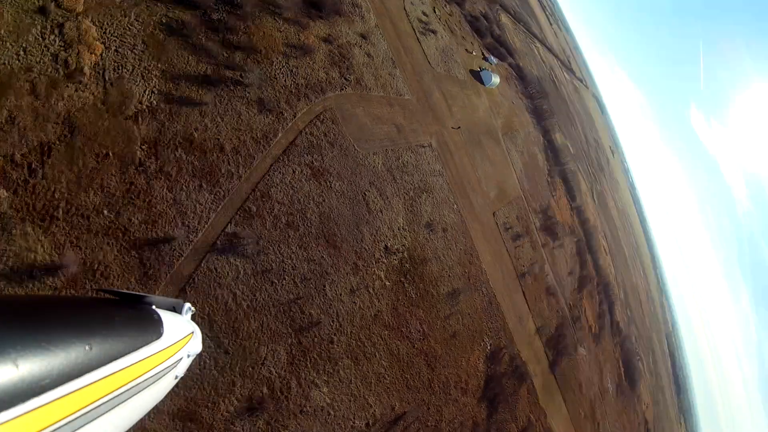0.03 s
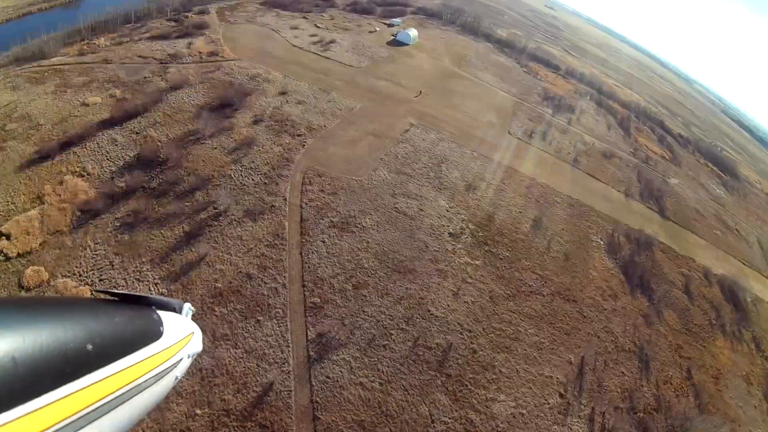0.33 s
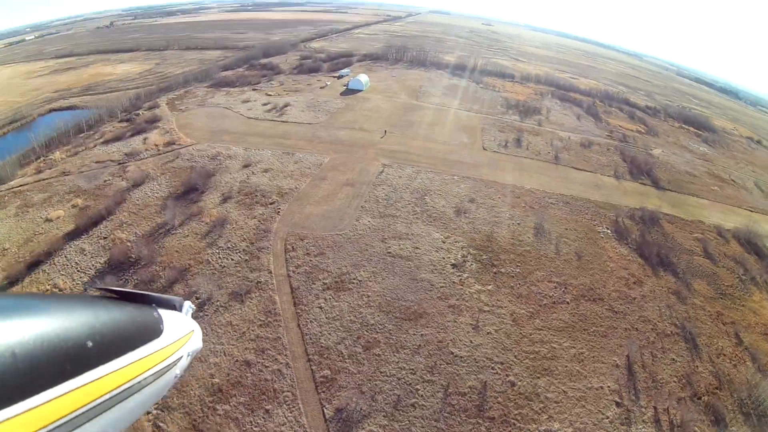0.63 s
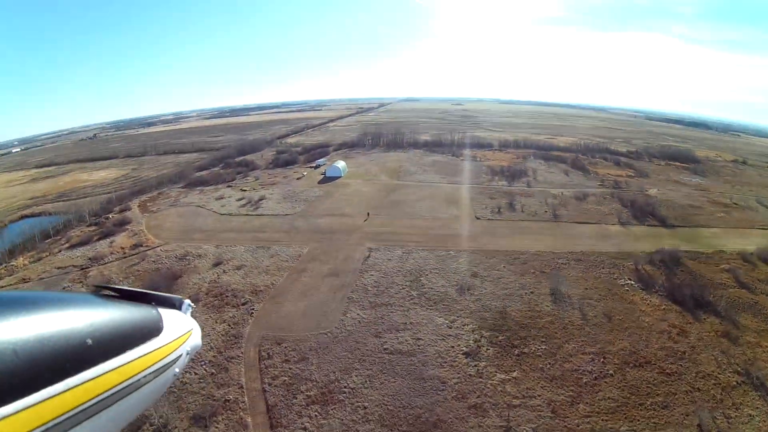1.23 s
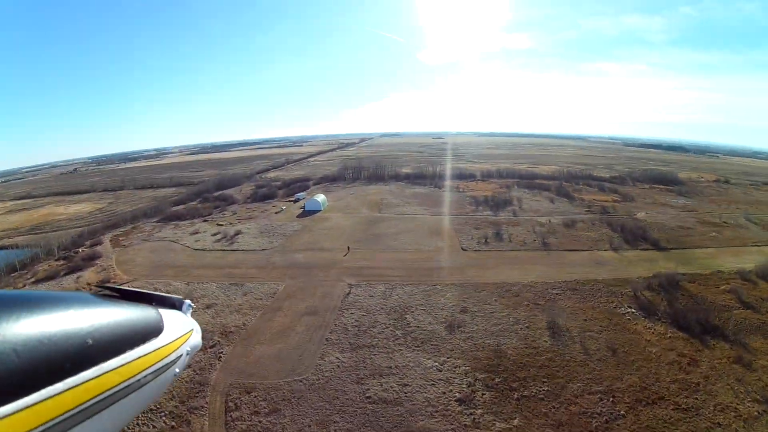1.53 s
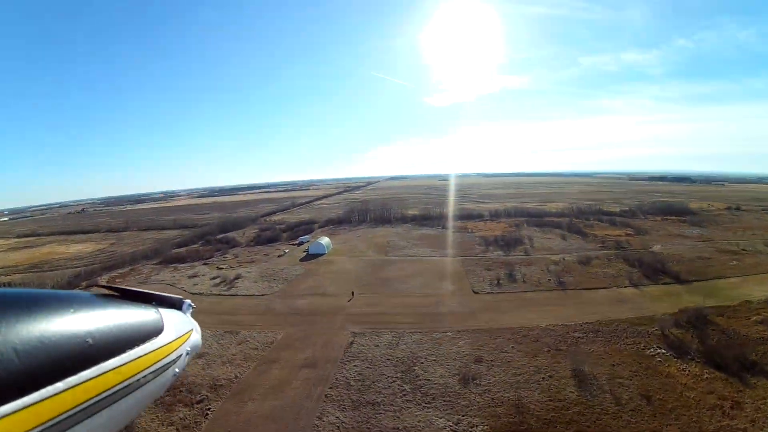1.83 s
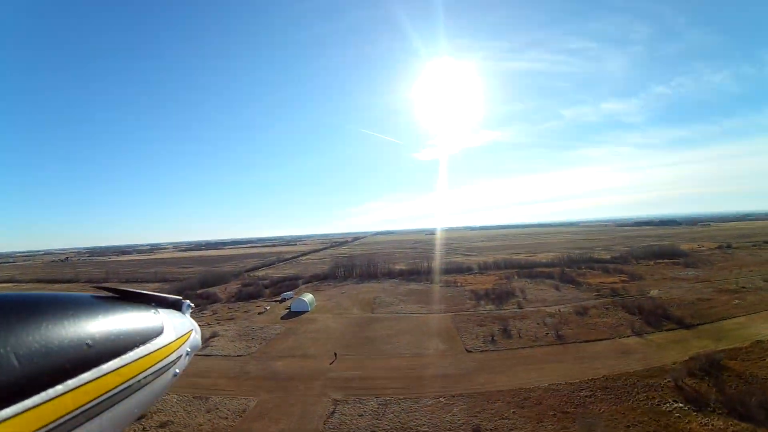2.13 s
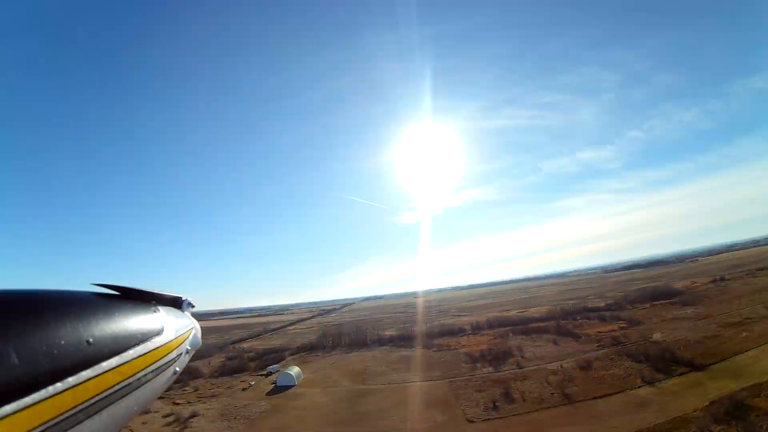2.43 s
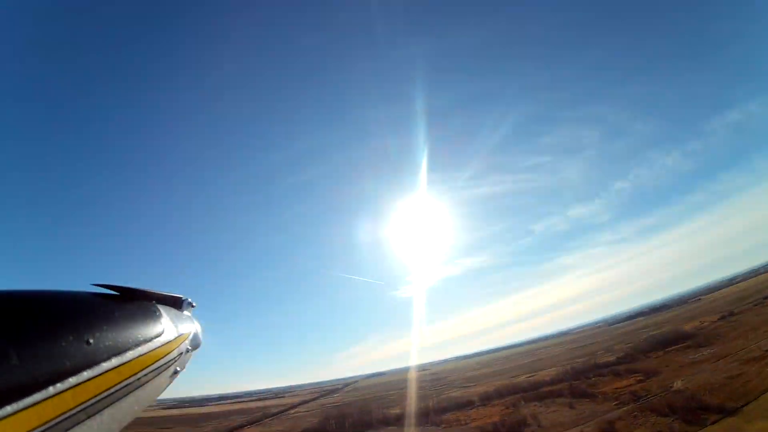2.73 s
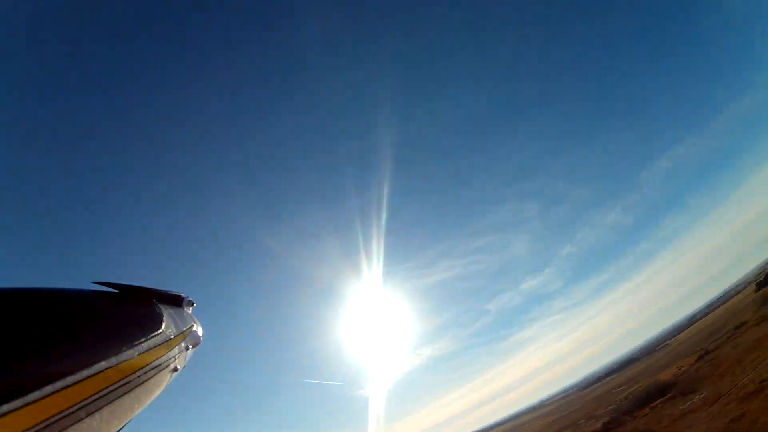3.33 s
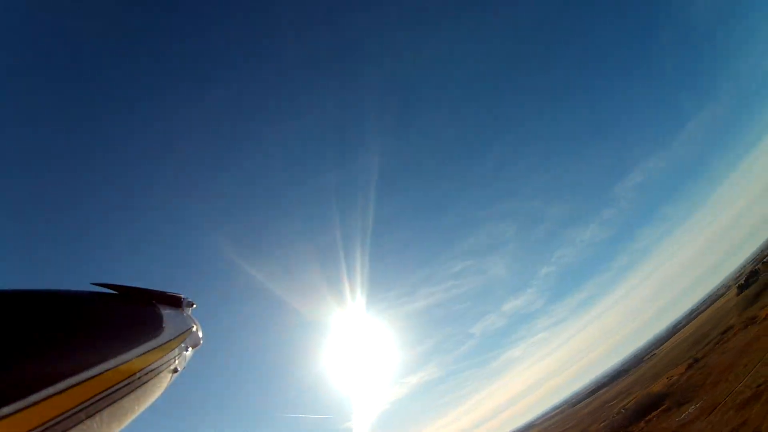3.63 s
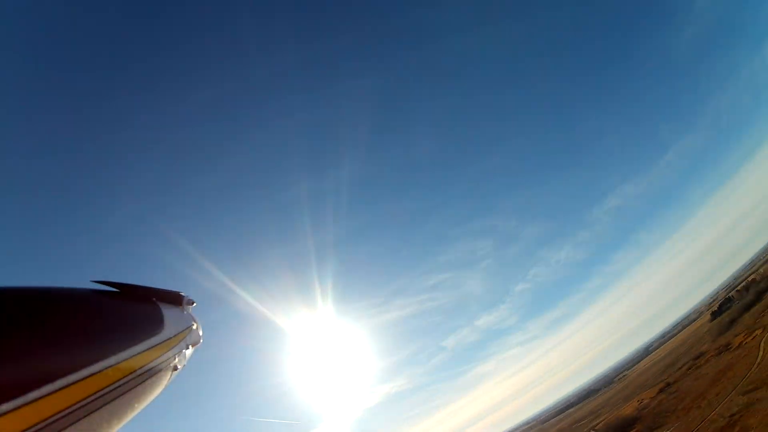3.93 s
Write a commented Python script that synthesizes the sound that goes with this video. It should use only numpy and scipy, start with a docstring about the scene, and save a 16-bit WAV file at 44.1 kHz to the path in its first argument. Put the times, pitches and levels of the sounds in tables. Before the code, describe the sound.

Strong wind rushes directly over a microphone on a flying model glider, a gusty roar with a bright, fluttering hiss above it. It swells in the first half second and stays loud, peaking between about 1 and 2 seconds, where the strongest gusts distort slightly. From around 2.7 seconds the roar falls away and the hiss grows steadily duller and quieter, leaving a softer rush at 4 seconds.

```python
"""Wind on a model glider

Air rushes over a small camera on a model glider that levels out of a fast bank and climbs away. Big swirls of
air roar in the microphone opening. Tiny swirls hiss above them and grow duller as the climb slows the glider.
The opening cuts two narrow gaps in the treble, and the strongest gusts are flattened at their peaks."""
import sys
import numpy as np
from scipy import signal
from scipy.io import wavfile

SR = 44100
rng = np.random.default_rng(int(sys.argv[2]) if len(sys.argv) > 2 else 0)


def bounce(signal):
    """Save signal as a 16-bit WAV file at the path given by the first command-line argument."""
    frames = np.transpose(np.atleast_2d(signal))
    limited = np.clip(frames, -1, 1)
    pcm = np.round(limited * 32767).astype(np.int16)
    wavfile.write(sys.argv[1], SR, pcm)


N = 176400

# How fast the air moves along the camera. Columns: time_s, share_of_top_speed
AIR_SPEED = [(0, 0.68), (.09, 0.72), (.13, 0.66), (.19, 0.75), (.26, .85), (.45, 0.85), (.66, 0.9),
             (.76, 0.83), (.91, 0.86), (1.0, 0.94), (1.13, 0.95), (1.2, 0.98), (1.4, 0.9), (1.6, 0.92),
             (1.7, 0.95), (1.93, 1.0), (2.1, 0.9), (2.34, 0.92), (2.56, .86), (2.65, .97), (2.71, 0.86),
             (2.75, .77), (2.89, 0.75), (2.96, .75), (3.12, 0.64), (3.28, .59), (3.4, 0.49), (3.52, 0.46),
             (3.66, 0.48), (3.76, 0.41), (3.87, 0.41), (3.95, 0.34), (4.0, 0.33)]
# How hard the gusts hit the microphone opening. Columns: time_s, strength_db
GUSTS = [(0, -14.5), (.19, -16), (.23, -12), (.32, -11), (.4, -12), (.52, -10.5), (.68, -10.5), (.77, -15),
         (.86, -12.5), (.93, -14), (.99, -11), (1.06, -11), (1.33, -10), (1.39, -12), (1.46, -9.5),
         (1.6, -12.5), (1.66, -10.6), (1.72, -11), (1.81, -9.5), (2.04, -10.5), (2.1, -13), (2.45, -12),
         (2.56, -13.5), (2.71, -13), (2.75, -16.6), (2.95, -15.5), (3.26, -20), (3.41, -23), (3.62, -21),
         (3.8, -26), (3.87, -25), (4.0, -32)]
# The roar's mix of low and high sound. Columns: pitch_hz, relative_level_db (per hertz)
ROAR_TONE = [(30, -27), (120, -26.5), (250, -22), (450, -16), (700, -6), (1000, 0), (1400, 2), (2000, -0.5),
             (3000, -8), (6000, -11.5), (12000, -43)]
# The hiss's mix before air speed dulls it. Columns: pitch_hz, relative_level_db (per hertz)
HISS_TONE = [(30, -43), (80, -26.5), (150, -21), (350, -13), (650, -3), (1400, 0.5), (2400, 0.4),
             (3400, 2.5), (5000, -0.3), (6100, -1.5), (7200, -0.5), (8700, -1), (10000, -1), (11200, 0),
             (12700, -5), (14300, -10.5), (15300, -17)]
# Gaps the opening cuts in the treble. Columns: pitch_hz, width_hz (for one filter pass)
TREBLE_GAPS = [(7960, 810), (13380, 510)]


def from_db(db):
    """Turn decibels into a number to multiply by."""
    return 10 ** (np.asarray(db) / 20)


def unit_power(sound):
    """Scale a sound so its average power is 1."""
    return sound / np.sqrt(np.mean(sound ** 2) + 1e-20)


def over_time(rows):
    """Join a table's points with lines, giving a value for every sample."""
    return np.interp(np.arange(N) / SR, *np.transpose(rows))


def level_at(tone, hz):
    """Read a tone table between its points, spacing octaves evenly."""
    pitch_hz, level_db = np.transpose(tone)
    return np.interp(np.log(hz), np.log(pitch_hz), level_db)


def wander(rate_hz):
    """A smooth random wobble of about size 1, changing roughly rate_hz times a second."""
    step, warm_up = 40, 2000   # samples per point; points to skip
    memory = np.exp(-2 * np.pi * step * rate_hz / SR)
    noise = rng.standard_normal(N // step + warm_up + 2)
    smooth = signal.lfilter([1], [1, -2 * memory, memory * memory], noise)[warm_up:]
    return np.interp(np.arange(N) / step, np.arange(len(smooth)), unit_power(smooth))


def swirling_air(tone, shared_db, shared_hz, own_db, own_hz):
    """Give (pitch, noise) bands whose loudness flutters both together and each on its own."""
    edges = np.r_[20, 50, 100, 180, np.geomspace(280, 4000, 15), np.arange(4600, 16100, 600)]
    centres = np.sqrt(edges[1:] * edges[:-1])
    gains = from_db(level_at(tone, centres)) * np.sqrt(np.diff(edges))
    gains = gains / np.linalg.norm(gains)
    noise = rng.standard_normal((3, N))   # neighbouring bands get different noise
    shared_flutter = shared_db * wander(shared_hz)
    for k, hz in enumerate(centres):
        band_filter = signal.butter(3, edges[k:k + 2], "band", fs=SR, output="sos")
        band = unit_power(signal.sosfilt(band_filter, noise[k % 3]))
        flutter = from_db(shared_flutter + own_db * wander(own_hz))
        yield hz, gains[k] * flutter * band


def wind_roar():
    """Big swirls of air break over the microphone opening in gusts."""
    usual_level_db, usual_gust_db, swing = -12.5, -12.5, 1.39
    level_db = usual_level_db + swing * (over_time(GUSTS) - usual_gust_db)
    bands = swirling_air(ROAR_TONE, shared_db=.5, shared_hz=18, own_db=.7, own_hz=11)
    return from_db(level_db) * sum(band for hz, band in bands)


def wind_hiss():
    """Tiny swirls run along the camera. Faster air is louder and makes smaller, brighter ones."""
    speed = over_time(AIR_SPEED)
    fade_above_hz = 8250 * speed ** 1.225   # set by the smallest swirls
    steepness = 2.52
    bands = swirling_air(HISS_TONE, shared_db=1.0, shared_hz=220, own_db=.5, own_hz=28)
    hiss = sum(band / np.sqrt(1 + (hz / fade_above_hz) ** (2 * steepness)) for hz, band in bands)
    return from_db(-8.5) * speed ** .78 * hiss


def microphone_opening(sound):
    """The hollow in front of the microphone cancels two narrow bands of treble."""
    for hz, width_hz in TREBLE_GAPS:
        notch = signal.iirnotch(hz, hz / width_hz, fs=SR)
        for _ in range(2):   # twice, for a deeper cut
            sound = signal.lfilter(*notch, sound)
    return sound


def scene():
    """Roar and hiss reach one microphone, so left and right are the same."""
    heard = microphone_opening(wind_roar() + wind_hiss())
    return np.stack([heard, heard])


def record(dry):
    """Peaks are flattened, adding grit and rumble to the strongest gusts, then the highest treble is cut."""
    clipped = np.clip(dry, -1.0, 1.0)
    treble_cut = signal.firwin(401, cutoff=15300, fs=SR)
    return signal.fftconvolve(clipped, treble_cut[None], "same", axes=1)


dry = scene()
out = record(dry)
bounce(out)
```